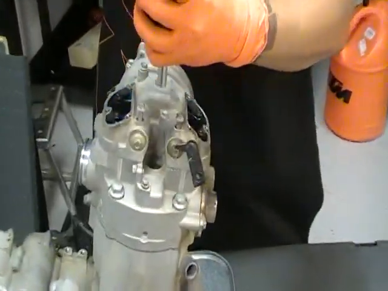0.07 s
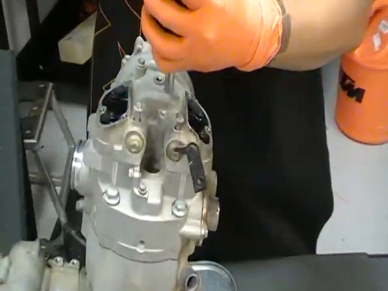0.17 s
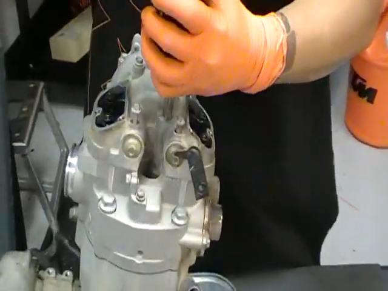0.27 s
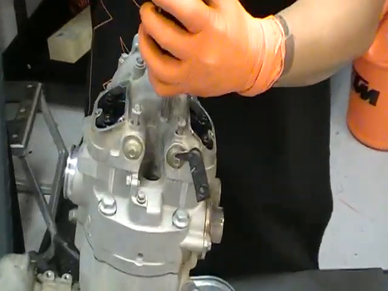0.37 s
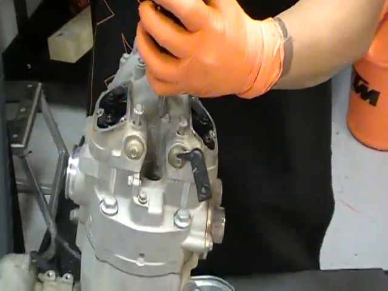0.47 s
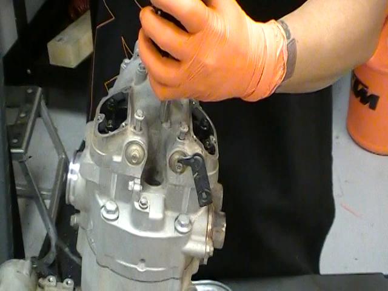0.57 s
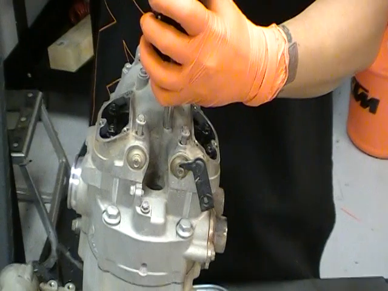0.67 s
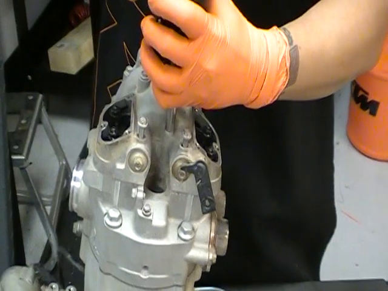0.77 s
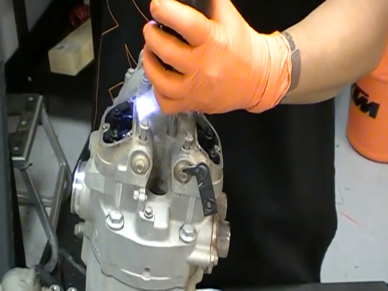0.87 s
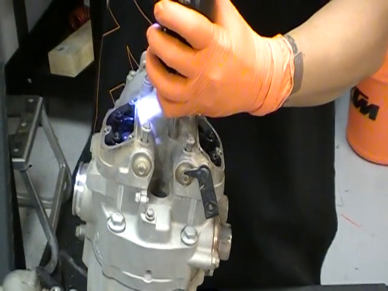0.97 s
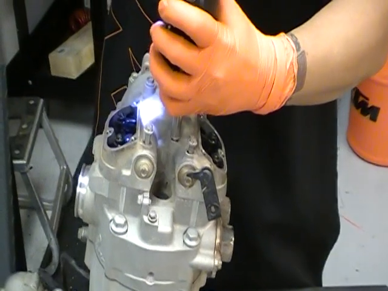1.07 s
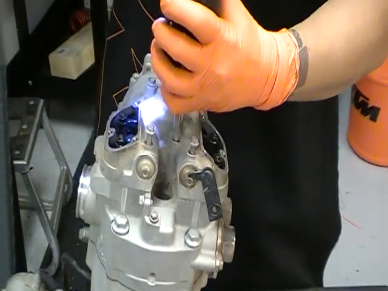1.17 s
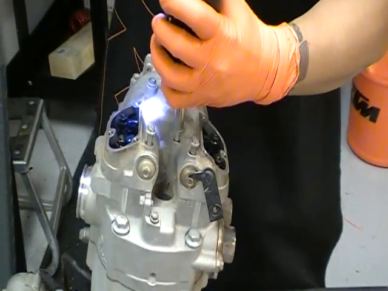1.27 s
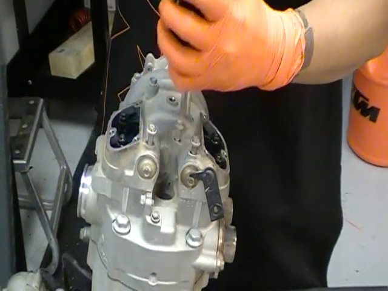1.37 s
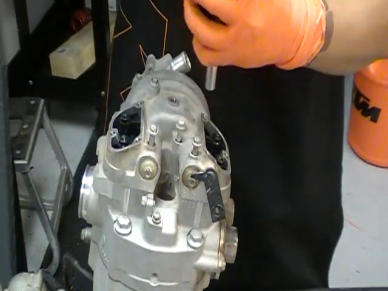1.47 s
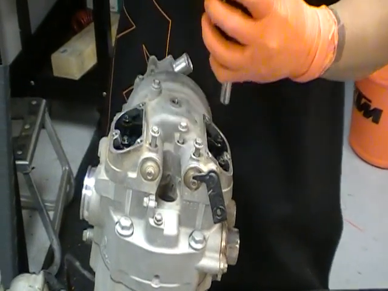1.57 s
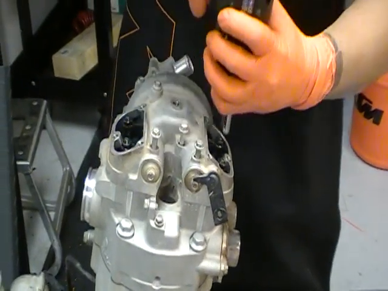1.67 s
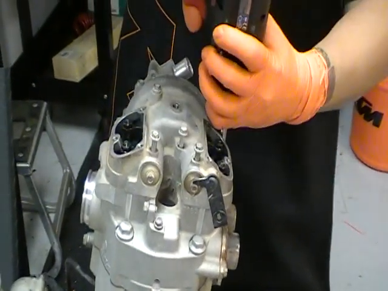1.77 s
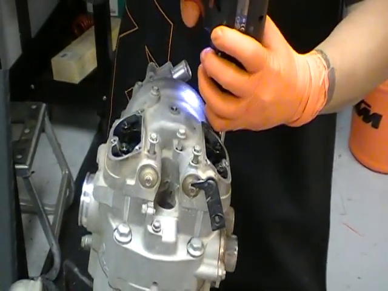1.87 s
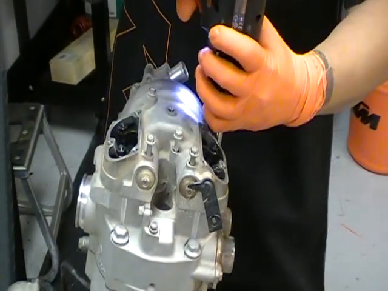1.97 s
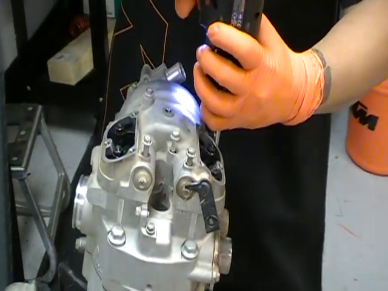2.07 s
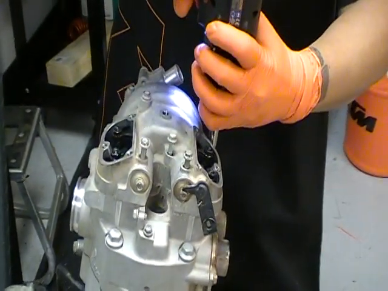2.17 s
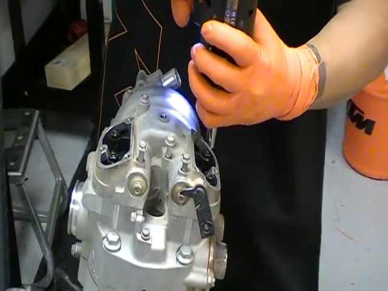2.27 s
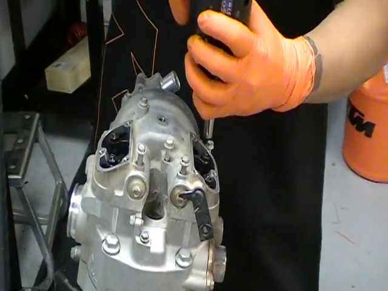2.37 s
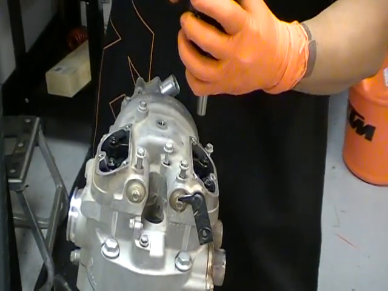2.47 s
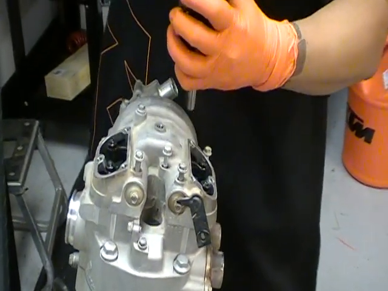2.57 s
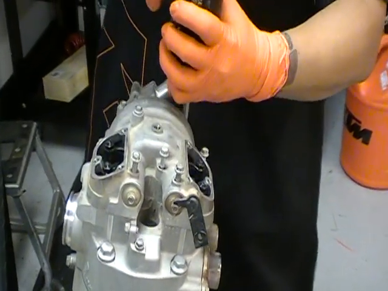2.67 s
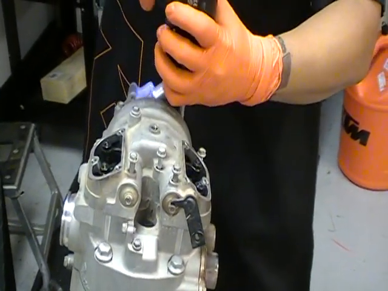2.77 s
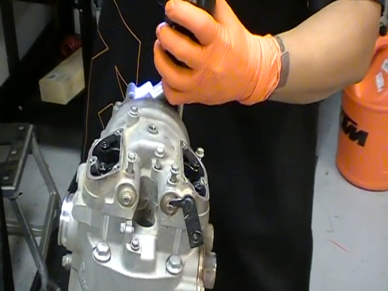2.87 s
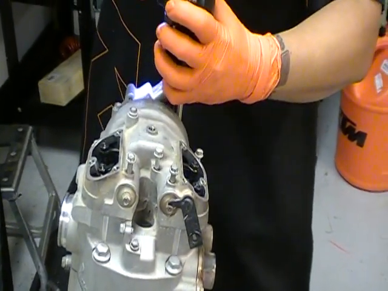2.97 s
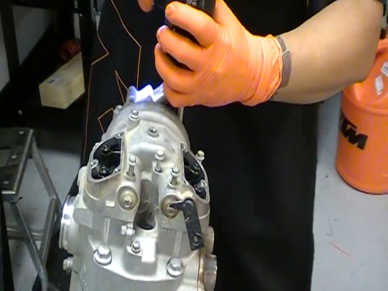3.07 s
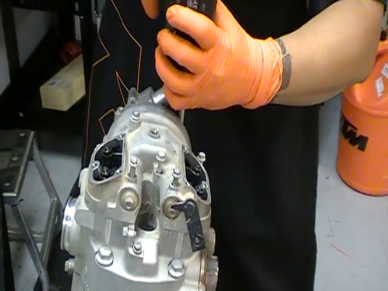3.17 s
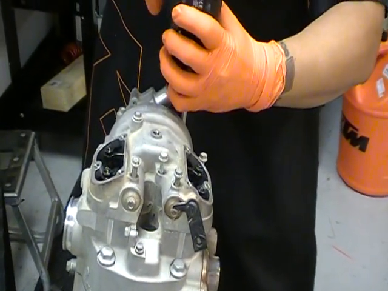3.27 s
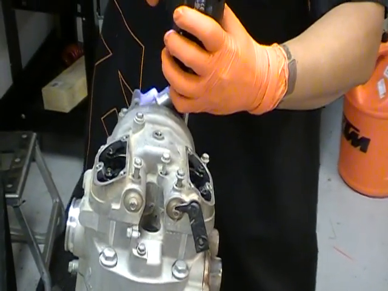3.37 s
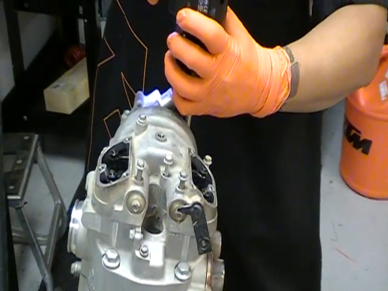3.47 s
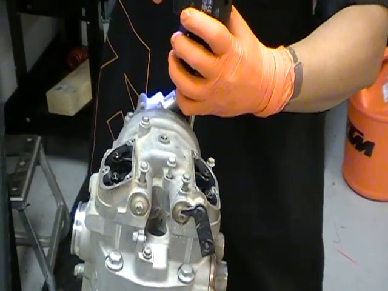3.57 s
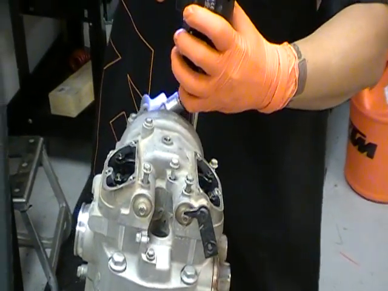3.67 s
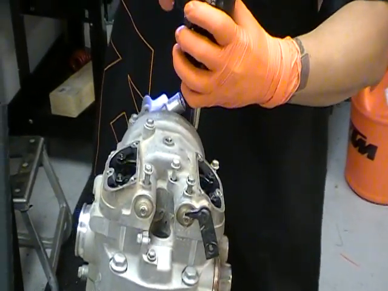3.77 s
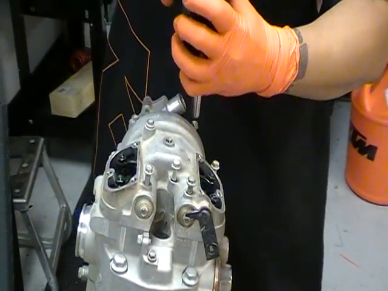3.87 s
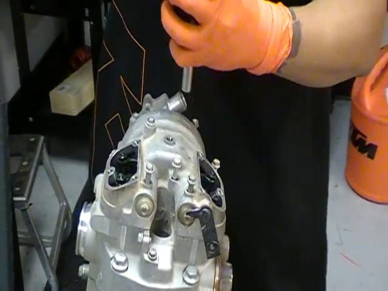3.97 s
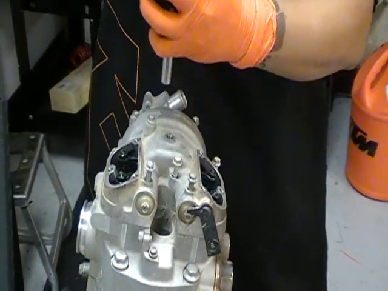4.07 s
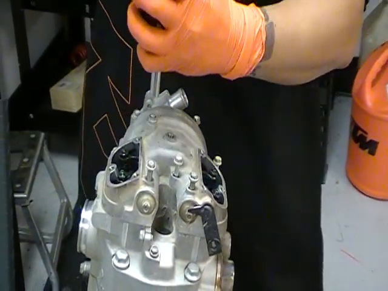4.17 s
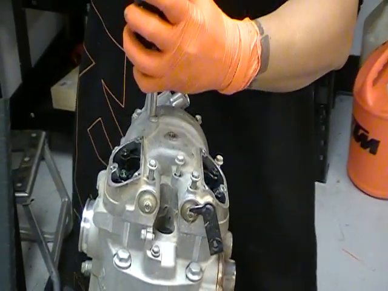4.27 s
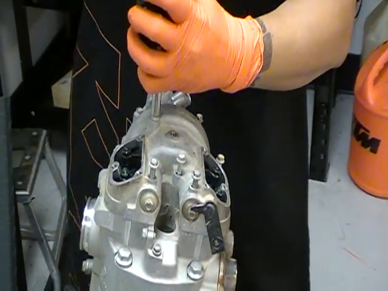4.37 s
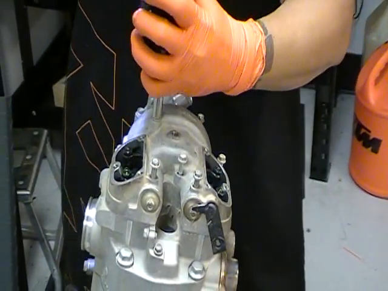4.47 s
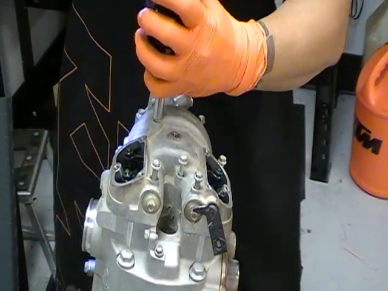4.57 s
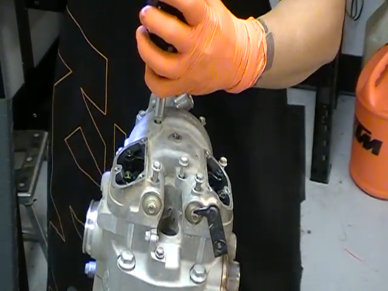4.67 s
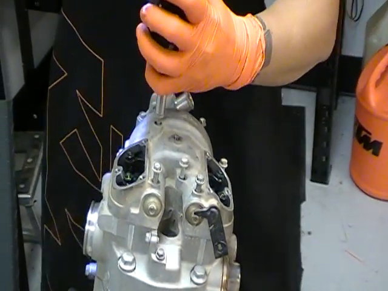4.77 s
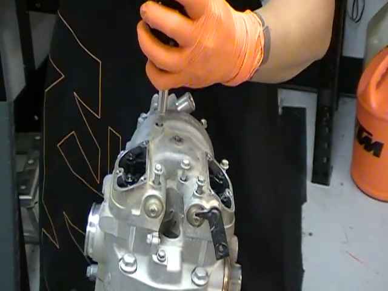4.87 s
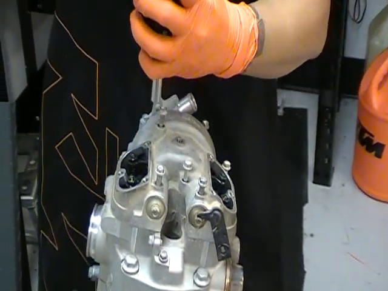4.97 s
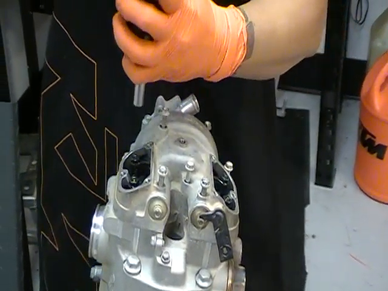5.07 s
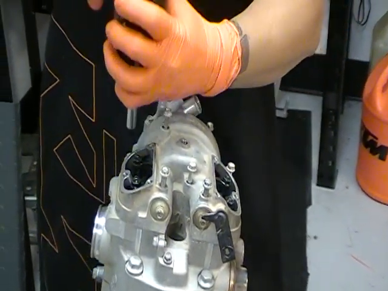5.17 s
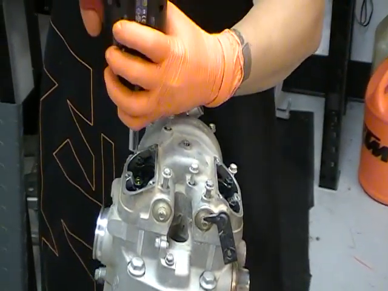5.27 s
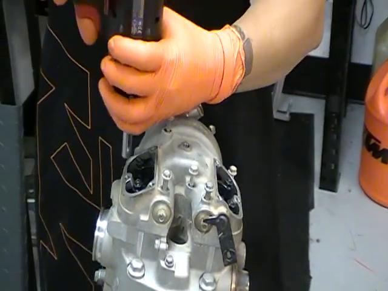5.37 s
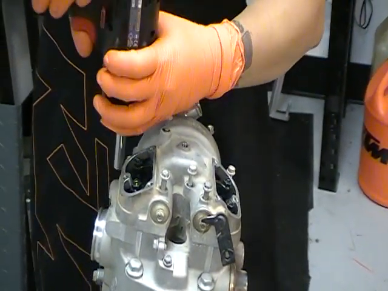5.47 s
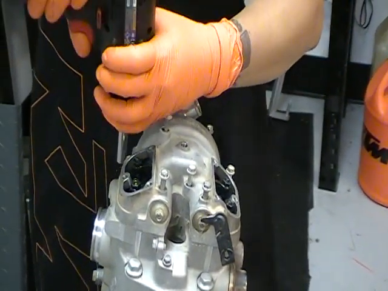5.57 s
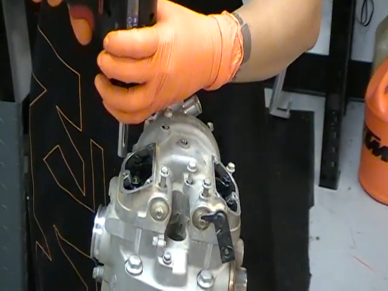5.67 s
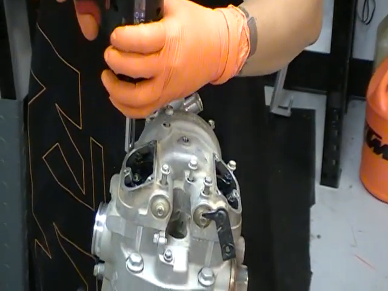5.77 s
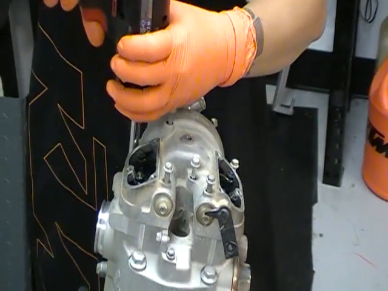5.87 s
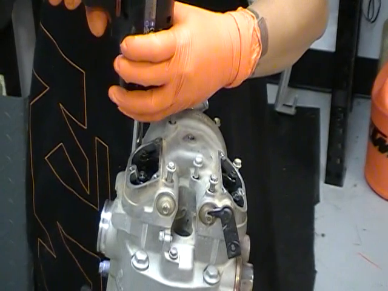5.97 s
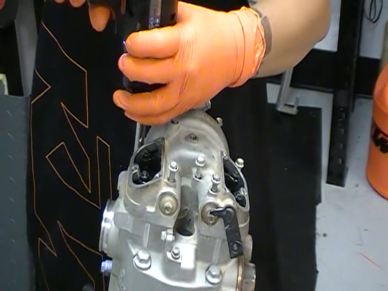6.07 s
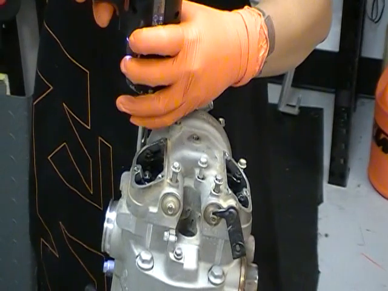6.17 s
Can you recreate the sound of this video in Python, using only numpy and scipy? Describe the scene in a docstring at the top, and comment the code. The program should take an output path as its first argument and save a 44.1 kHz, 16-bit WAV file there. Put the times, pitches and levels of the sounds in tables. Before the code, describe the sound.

Six short bursts of a whining cordless impact driver, metal clinks, grinding and rapid hammering loosening bolts from an engine over a steady fan.

```python
"""A cordless impact driver spins six bolts out of an aluminium engine, close by in a workshop.
The socket usually clinks onto the head first; it grinds and hammers until the thread gives, made from shaped
noise and short strikes, while the motor, sines and noise tied to shaft speed, whines up and then brakes.
On the third bolt the socket keeps rattling. Behind it a fan hums and rushes steadily; the recorder's gain control
ducks under the hammer blows, so motor and fan swell back after each bolt. Both channels are alike."""
import sys
import numpy as np
from scipy import signal
from scipy.fft import rfft, irfft, next_fast_len
from scipy.io import wavfile
from scipy.ndimage import uniform_filter1d, map_coordinates

SR = 44100
rng = np.random.default_rng(int(sys.argv[2]) if len(sys.argv) > 2 else 0)


def store_wav(level_fs):
    """Save 16-bit WAV to argv[1]."""
    pcm = np.round(np.clip(np.atleast_2d(level_fs), -1, 1) * 32767)
    wavfile.write(sys.argv[1], SR, pcm.T.astype(np.int16))


N = 274302
TIME = np.arange(N) / SR

# trigger pulls: (start [s], release [s], top shaft speed [Hz], spin-up time [s],
# relative level [dB], whine over that level [dB])
TRIGGER_PULLS = [(0.839, 1.291, 449.3, 0.12, -5.5, 0), (1.86, 2.29, 447.7, 0.096, -4.5, -1.5),
                 (2.76, 3.082, 439, 0.095, -6.5, 1), (3.363, 3.776, 433.5, 0.099, -6, -2),
                 (4.393, 4.861, 451.7, .118, -6, -1), (5.93, 6.414, 443.3, 0.1, -8.5, 0.5)]
# weaker motor and gear lines: (multiple of the shaft speed [1], relative level [dB])
MOTOR_LINES = [(1, -36), (3, -19), (4, -20), (5, -10), (10, -16.5), (25, -14), (30, -3.5)]
# noise of the gears: (frequency [Hz], relative level [dB per Hz])
GEAR_SPECTRUM = [(100, -62), (200, -64), (420, -27), (600, -17.5), (950, -13), (1280, -3.5), (1550, -7.5),
                 (2100, 1.5), (2600, -4), (5500, -5), (7000, -2.5), (9000, 2.5), (12800, 4), (15000, -12)]
# short runs of blows that break each bolt loose: (first blow [s], first gap [s], number of blows [1],
# relative peak level [dB], loss per blow [dB])
HAMMER_RUNS = [(0.8806, .028, 4, 36, 2.5), (1.8981, 0.025, 4, 35.5, 3.5), (2.862, .025, 3, 33, 5.5),
               (3.3837, .0297, 4, 35.5, 2.4), (4.4566, .0258, 4, 33, 1.65), (5.9865, 0.026, 3, 30, 2.5)]
GAP_SHRINK = 0.89  # each gap over the one before
HAMMER_BODY_DB = -17.5  # the casting's relative share of a blow
# the socket knocks against the bolt's flats: (time [s], relative peak level [dB], relative body level [dB])
FLAT_KNOCKS = [(0.849, -11.5, -3), (0.8542, 4, -4), (0.871, 7, -18), (1.8546, 4.5, -23), (1.8775, 3, -6),
               (1.8866, 6, -5), (2.8092, -1, -13), (2.8305, 12, -10), (3.1491, 9.5, -7), (3.1737, 0, 3),
               (4.4243, 10.5, -30), (4.4417, 8.5, -16), (4.4464, 7, -24), (5.9579, -6, -12),
               (5.9634, -1, -7.5)]
# the socket meets a bolt head: (time [s], relative peak level [dB], relative body level [dB])
HEAD_CLINKS = [(0.2563, 13.5, -22), (0.5917, -13, -15), (0.7122, -12.5, -12.5), (1.7061, 6, -21),
               (2.675, 8, -15.5), (4.267, 10.5, -31), (5.8023, -10, -15), (5.8301, -15, -10)]
# steel of the blows and knocks: (frequency [Hz], relative level [dB per Hz])
STEEL_SPECTRUM = [(60, -60), (200, -111), (1000, -21), (2500, -12), (3500, 2), (5000, -4.5), (7000, -2),
                  (9500, 5.5), (11500, 3), (13500, -1.5), (15500, -19)]
# steel of the clinking socket: (frequency [Hz], relative level [dB per Hz])
SOCKET_SPECTRUM = [(60, -66), (300, -24), (1500, -25), (3500, -14.5), (5500, -15.5), (7000, -9.5),
                   (8300, -2.5), (10000, -6.5), (12500, -6.5), (15000, -35)]
# duller knock of the engine casting: (frequency [Hz], relative level [dB per Hz])
CASTING_SPECTRUM = [(30, -46), (150, -101), (400, -25), (800, 3.5), (1300, 14), (2000, 15), (3500, 15),
                    (5000, 16), (9000, -33)]
# the socket grinds under load until the thread gives: (start [s], end [s], relative level at the end [dB])
GRIND_SPELLS = [(0.828, 0.858, -17.5), (0.862, 0.876, -7), (1.836, 1.917, -13.5), (2.78, 2.82, -10),
                (2.841, 2.859, -6.5), (3.359, 3.391, -6.5), (4.413, 4.446, -9), (5.925, 5.959, -21.5),
                (5.949, 5.982, -11.5)]
# grinding noise: (frequency [Hz], relative level [dB per Hz])
GRIND_SPECTRUM = [(24, -55), (40, -59), (397, -37.5), (653, -11), (998, -9.5), (1130, -2.5), (2010, 1.5),
                  (2510, -1), (3930, -3), (4920, -22), (5440, -6.5), (6320, -7.5), (10400, -5.5),
                  (14400, -18), (15500, -10)]
# the socket chatters on a loose bolt: (time [s], relative level [dB])
RATTLE_LEVELS = [(2.8, -32), (2.82, -12), (2.85, -17), (2.87, 4), (2.905, 8), (2.996, 2.5), (3.056, 4.5),
                 (3.146, -5), (3.17, -15.5)]
# the socket's scrape on the loose bolt: (frequency [Hz], relative level [dB per Hz])
SCRAPE_SPECTRUM = [(100, -62), (400, -15), (1000, -10.5), (1800, -2), (2700, -6.5), (3700, -2), (5200, -6),
                   (8000, -0.5), (12500, -4), (15000, -5.5)]
# the socket's taps on the loose bolt: (frequency [Hz], relative level [dB per Hz])
TAP_SPECTRUM = [(100, -58), (500, -25), (1700, -20), (3700, -19), (6200, -12), (7700, 2), (9000, -3),
                (10500, -6), (12500, -11), (15000, -20)]
# whine left in the room from the bolt before: (frequency [Hz], relative level [dB per Hz])
LINGERING_SPECTRUM = [(200, -47), (2000, -23), (5800, -20), (6350, -13), (6520, -2), (6700, -27), (13000, -37)]
# the workshop's decay: (frequency [Hz], time to fall 60 dB [s])
WORKSHOP_T60 = [(200, 0.31), (2000, 0.43), (6500, 0.36), (10000, 0.2), (15000, 0.2)]
# hum lines of the fan's motor: (multiple of the fan's speed [1], relative level [dB])
FAN_LINES = [(2, -19), (4, -1), (5, -12), (6, -6.5), (7, -8.5), (8, -3.5), (9, -4.5), (10, -5.5), (12, 1.5),
             (15, -3.5)]
# the fan's rushing air: (frequency [Hz], relative level [dB per Hz])
RUSH_SPECTRUM = [(30, -20), (90, -28), (180, -19), (350, -9.5), (700, 2), (1400, 0.3), (2500, -3.5),
                 (4000, -10), (6000, -15), (9000, -28), (13000, -41), (14500, -54)]
# the fan's fine hiss: (frequency [Hz], relative level [dB per Hz])
HISS_SPECTRUM = [(3000, -35), (6500, -11), (8000, -3), (9000, 0.5), (11000, -4), (13200, -14.5),
                 (14200, -31), (15000, -47)]
FAN_HZ = 55.8
FAN_DB, HUM_DB = -39, -53.5  # gains of the fan's rush and hum
# the recorder's gain control: ceiling, recovery speed, and how far it is turned down at the start
CEILING_DB, RECOVERY_DB_PER_S, START_CUT_DB = -9, 30.5, 22.5
TOP_HZ = 15300  # band limit


def amp(db):
    """Decibels to gain."""
    return np.exp(np.asarray(db) * (np.log(10) / 20))


def unit(x):
    """Scale to rms 1."""
    return x / np.sqrt(np.mean(x ** 2) + 1e-20)


def along(points, hz):
    """Interpolate (frequency [Hz], value) points on a log frequency axis."""
    f, v = np.transpose(points)
    return np.interp(np.log(hz + 1), np.log(f + 1), v)


def curves(rows):
    """One value per sample for each column after the time."""
    s, *cols = np.transpose(rows)
    return [np.interp(TIME, s, c) for c in cols]


def wobble(rate):
    """A smooth random curve, rate knots a second."""
    knots = rng.standard_normal(int(N * rate / SR) + 4)
    steps = np.arange(len(knots) * 10) / 10
    return np.interp(TIME * rate, steps, map_coordinates(knots, [steps]))


def filtered(x, response):
    """x times a response of frequency."""
    m = next_fast_len(len(x) + 8192)
    return irfft(rfft(x, m) * response(np.fft.rfftfreq(m, 1 / SR)), m)[:len(x)]


def coloured(x, spectrum):
    """x with the given spectrum, at rms 1."""
    return unit(filtered(x, lambda hz: amp(along(spectrum, hz))))


def noise(spectrum, size=N):
    """Coloured noise of rms 1."""
    return coloured(rng.standard_normal(size), spectrum)


def ticks(rate, spread_db, life):
    """Envelope of rms 1 of tiny random contacts, rate a second, each dying away over life seconds."""
    contacts = rng.random(N) < rate / SR
    sizes = amp(spread_db * np.clip(rng.standard_normal(N), -2, 2))
    energy = contacts * sizes ** 2
    return unit(np.sqrt(signal.lfilter([1], [1, -np.exp(-1 / (life * SR))], energy)))


def add(track, s, sound):
    """Mix a sound into the track at s seconds."""
    part = track[round(s * SR):][:len(sound)]
    part += sound[:len(part)]


def motor(brake_time=0.068, ease=0.03, ease_time=0.02, gear_power=1.79, coast_power=0.63,
          whine_power=4.5, flutter=0.0024, drift=0.002, rough_db=2):
    """The shaft nears its top speed and is braked at release, louder the faster it turns: (gears, high whine)."""
    shaft_hz, drive, whine_gain = np.zeros((3, N))
    for start, release, top_hz, spin_up, db, whine_db in TRIGGER_PULLS:
        rise = 1 - np.exp(-np.maximum(TIME - start, 0) / spin_up)
        easing = 1 - ease * np.exp(np.minimum(TIME - release, 0) / ease_time)  # the finger lets up
        brake = np.exp(-np.maximum(TIME - release, 0) / brake_time)
        speed = rise * easing * brake
        shaft_hz += top_hz * speed
        drive += amp(db) * speed ** gear_power * brake ** coast_power
        whine_gain += amp(db + whine_db) * speed ** whine_power
    unsteady = 1 + flutter * wobble(150) + drift * wobble(22)
    turns = 2 * np.pi * np.cumsum(shaft_hz * unsteady) / SR  # shaft angle [rad]

    def line(order):
        """A sine at a multiple of the shaft speed, with a rough level."""
        return amp(rough_db * wobble(120)) * np.sin(round(order) * turns)

    lines = sum(amp(db) * line(k) for k, db in MOTOR_LINES)
    mesh = (1 + 0.14 * np.sin(turns)) * amp(1.4 * wobble(200))  # the teeth rub harder once a turn
    gears = drive * mesh * noise(GEAR_SPECTRUM) + whine_gain * lines
    whine = whine_gain * amp(3.5) * line(order=15)
    return gears, whine


def hammer_blows():
    """One (time, peak dB, body dB) per blow: the gaps close and the blows weaken as the bolt frees."""
    rows = []
    for first, gap, blows, db, loss_db in HAMMER_RUNS:
        for k in range(round(blows)):
            delay = gap * sum(GAP_SHRINK ** j for j in range(k))
            rows.append((first + delay, db - loss_db * k, HAMMER_BODY_DB))
    return rows


def strikes(rows, metal, crack_t60, ring_t60, ring_db, body_t60, metal_db, body_db,
            bounce=0.0021, bounce_db=-10):
    """Steel on steel: a crack, its rebound and a short dense ring, with a duller knock from the casting."""
    out, t = np.zeros(N), np.arange(SR // 10) / SR
    for s, db, body in rows:
        crack = amp(-60 * t / crack_t60)
        rebound = (t > bounce) * amp(bounce_db - 60 * np.abs(t - bounce) / crack_t60)
        ring = amp(ring_db - 60 * t / ring_t60)
        steel = amp(metal_db) * (crack + rebound + ring) * noise(metal, size=len(t))
        knock = amp(body + body_db - 60 * t / body_t60) * noise(CASTING_SPECTRUM, size=len(t))
        contact = 1 - np.exp(-t / 0.00012)  # softens the onset
        add(out, s, amp(db) * contact * (steel + knock))
    return out


def grinding(swell_db=15, let_go=0.0062, freed_db=4.5, freed_time=0.045):
    """Torque builds on the tight bolt: dense slips grow louder until it gives; the freed thread quietens."""
    level = np.zeros(N)
    for start, end, db in GRIND_SPELLS:
        load = np.clip((TIME - start) / (end - start), 0, 1)
        swell = amp(db - swell_db * (1 - load) ** 2) * np.minimum(load * 8, 1)
        level += swell * np.exp(-np.maximum(TIME - end, 0) / let_go)
    for s, *_ in HAMMER_RUNS:  # the freed thread scrapes on from the first blow
        level += amp(freed_db) * (TIME > s) * np.exp(-np.abs(TIME - s) / freed_time)
    slips = 0.4 + 0.6 * ticks(rate=500, spread_db=4, life=0.0009)
    return amp(-2.5) * level * slips * noise(GRIND_SPECTRUM)


def rattle(fade=0.013, rate=125, scrape_db=-4, tap_db=9, tap_t60=0.0082):
    """The socket scrapes round the spinning bolt and taps it at uneven intervals."""
    outside = np.abs(TIME - np.clip(TIME, RATTLE_LEVELS[0][0], RATTLE_LEVELS[-1][0]))
    level = amp(curves(RATTLE_LEVELS)[0]) * np.exp(-outside / fade)
    tap_count = np.floor(np.cumsum(rate * np.exp(0.4 * wobble(90))) / SR)
    contacts = np.diff(tap_count, prepend=0)
    sizes = contacts * amp(2.2 * np.clip(rng.standard_normal(N), -2, 1.5))
    taps = signal.lfilter([1], [1, -amp(-60 / (tap_t60 * SR))], sizes)
    scrape = amp(scrape_db) * noise(SCRAPE_SPECTRUM)
    return level * (scrape + amp(tap_db) * taps * noise(TAP_SPECTRUM))


def without_bass(x, edge_hz):
    """Small steel parts radiate little below their edge frequency."""
    return signal.sosfilt(signal.butter(3, edge_hz, "highpass", fs=SR, output="sos"), x)


def room(x, gap=0.0018):
    """The workshop's answer: noise that builds over the gap [s], each frequency dying at its own speed."""
    hz, t, z = signal.stft(rng.standard_normal(SR), SR, nperseg=256)
    decay = amp(-60 * t / along(WORKSHOP_T60, hz)[:, None])
    tail = signal.istft(z * decay, SR, nperseg=256)[1]
    tail = tail * (1 - np.exp(-np.arange(len(tail)) / (gap * SR)))
    return signal.fftconvolve(x, tail / np.linalg.norm(tail))[:N]


def lingering(db=-26, t60=0.31):
    """The whine of the bolt before still dies away in the room, as decaying narrow noise."""
    return amp(db - 60 * TIME / t60) * noise(LINGERING_SPECTRUM)


def fan(hiss_db=-3.5, waver_db=2.0):
    """Rushing air, a fine hiss and the slightly unsteady hum of the fan's motor."""
    turns = 2 * np.pi * np.cumsum(FAN_HZ * (1 + 0.001522 * wobble(4.5))) / SR
    hum = np.zeros(N)
    for k, db in FAN_LINES:
        phase = rng.uniform(0, 2 * np.pi)
        hum += amp(db + waver_db * wobble(5.8)) * np.sin(round(k) * turns + phase)
    air = noise(RUSH_SPECTRUM) + amp(hiss_db) * noise(HISS_SPECTRUM)
    return amp(FAN_DB) * air + amp(HUM_DB) * hum


def gain_control(x, size=48):
    """The gain drops at once under any peak above the ceiling, then creeps back at a steady rate in dB."""
    power = np.abs(uniform_filter1d(np.mean(x ** 2, axis=0), size))  # size in samples
    level_db = 10 * np.log10(power + 1e-12)
    needed_db = np.minimum(CEILING_DB - level_db, 0)
    recovered_db = RECOVERY_DB_PER_S * TIME
    deepest_db = np.minimum.accumulate(needed_db - recovered_db)
    gain_db = np.minimum(deepest_db, -START_CUT_DB) + recovered_db
    return x * amp(uniform_filter1d(gain_db, size // 2))


def scene():
    """The tool close by, the room and fan behind it, all in the centre."""
    gears, whine = motor()
    blows = strikes(hammer_blows() + FLAT_KNOCKS, STEEL_SPECTRUM, crack_t60=0.0052, ring_t60=0.11,
                    ring_db=-17.5, body_t60=0.013, metal_db=-7.0, body_db=-3.5)
    clinks = strikes(HEAD_CLINKS, SOCKET_SPECTRUM, crack_t60=0.015, ring_t60=0.061,
                     ring_db=-17.5, body_t60=0.038, metal_db=-13.5, body_db=-1)
    loaded = without_bass(blows + grinding(), edge_hz=310) + without_bass(rattle(), edge_hz=470)
    # what each source sends into the room
    spill = amp(-8.0) * gears + amp(-5) * whine + amp(-11.5) * loaded + amp(-11.0) * clinks
    mix = gears + whine + loaded + clinks + room(spill) + lingering() + fan()
    return np.array([mix, mix])


def record(dry, low_cut_hz=110):
    """Gain control ducks under the blows, then a low cut, rounding of the sharpest peaks and a band limit."""
    low_cut = signal.butter(2, low_cut_hz, "highpass", fs=SR, output="sos")
    thin = signal.sosfilt(low_cut, gain_control(dry))
    rounded = thin / (1 + np.abs(thin / 0.95) ** 6) ** (1 / 6)

    def band_limit(hz):
        """A steep fall above the top frequency."""
        return 1 / np.sqrt(1 + (hz / TOP_HZ) ** 120)

    return np.array([filtered(side, band_limit) for side in rounded])


dry = scene()
out = record(dry)
store_wav(out)
```